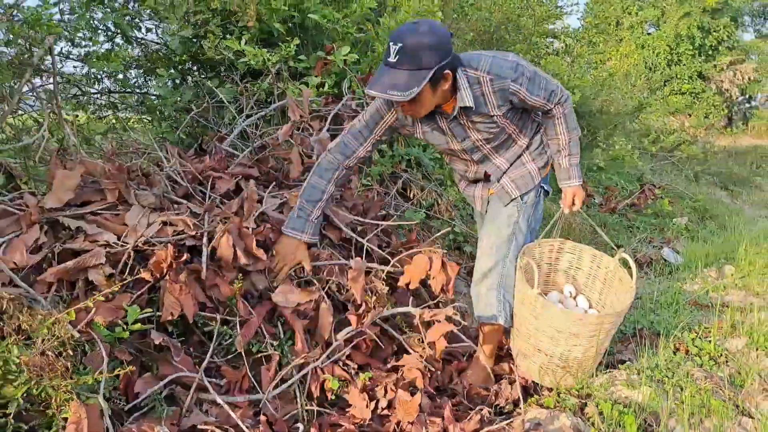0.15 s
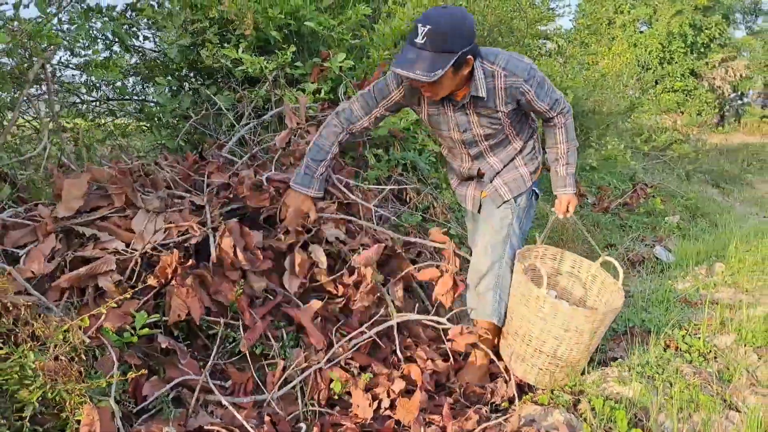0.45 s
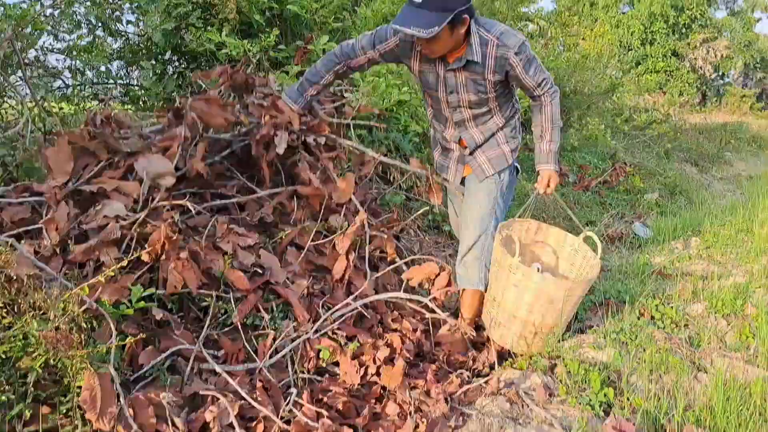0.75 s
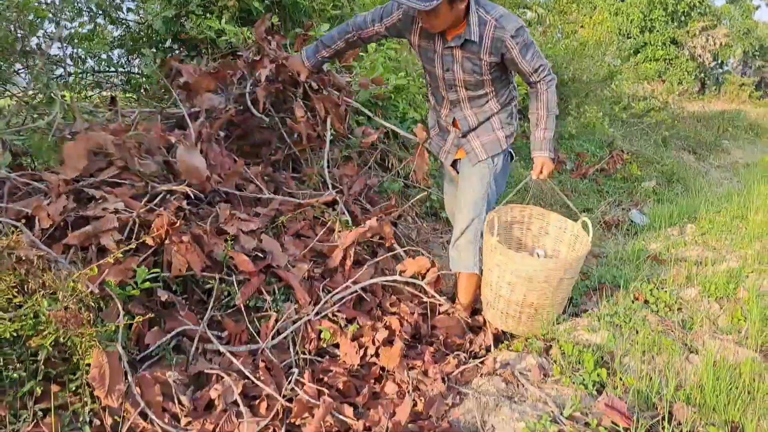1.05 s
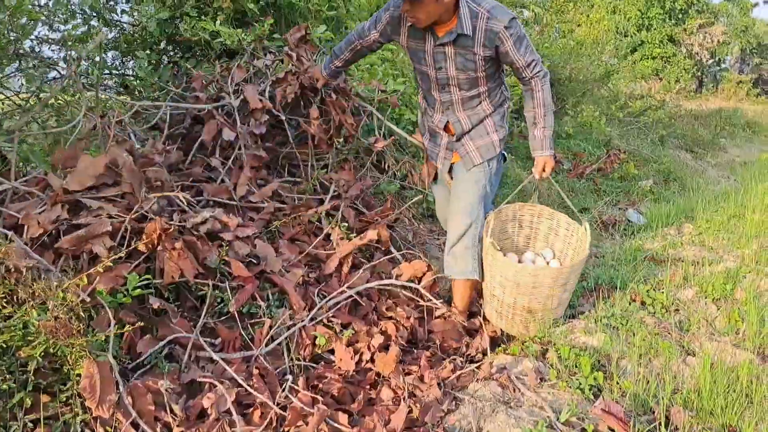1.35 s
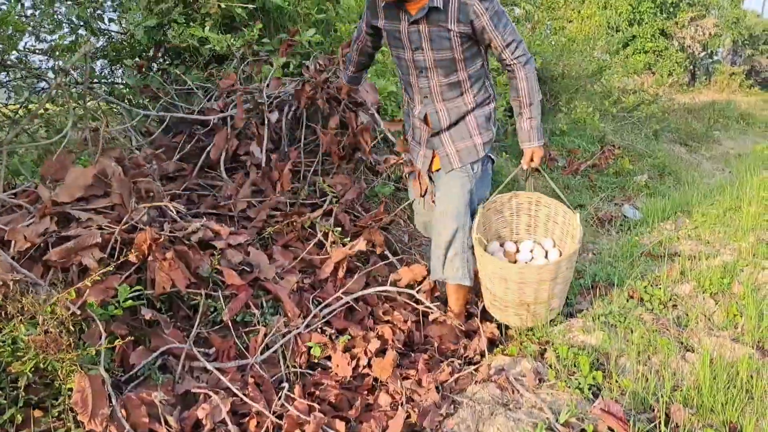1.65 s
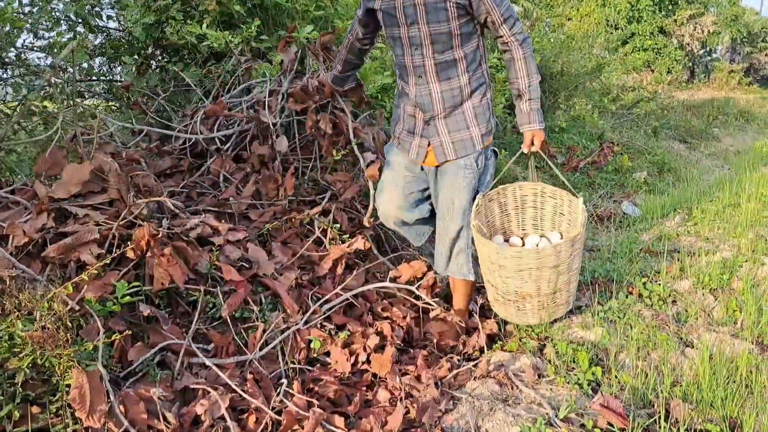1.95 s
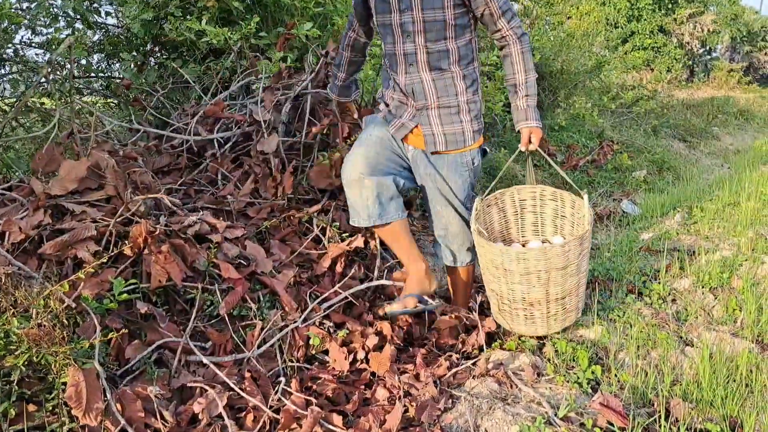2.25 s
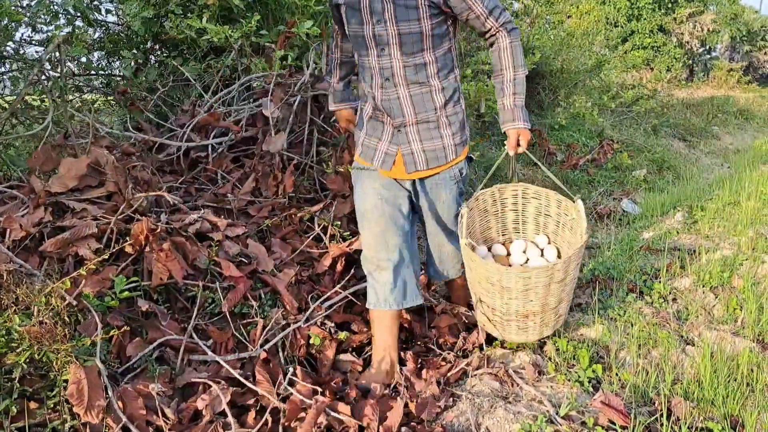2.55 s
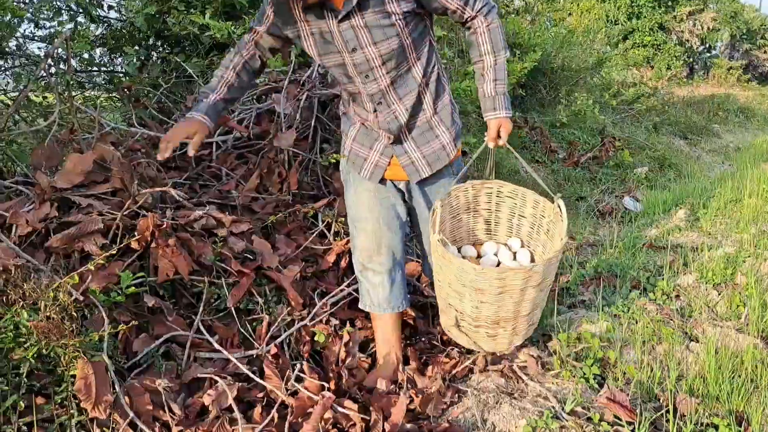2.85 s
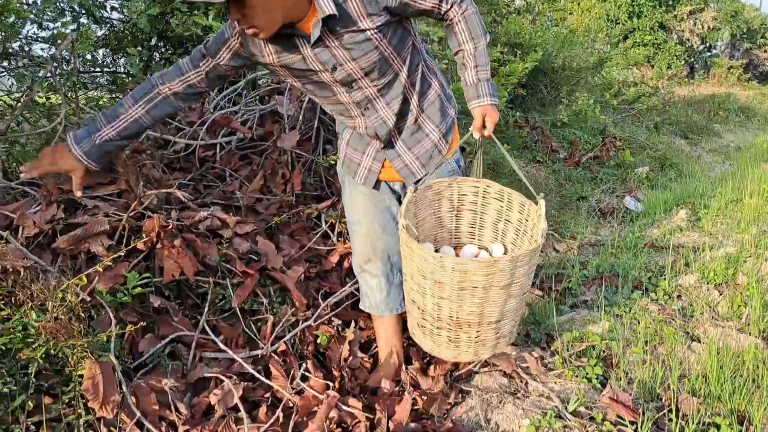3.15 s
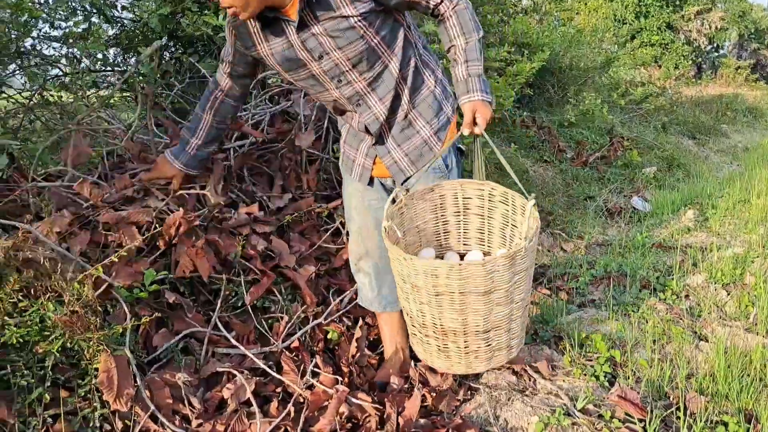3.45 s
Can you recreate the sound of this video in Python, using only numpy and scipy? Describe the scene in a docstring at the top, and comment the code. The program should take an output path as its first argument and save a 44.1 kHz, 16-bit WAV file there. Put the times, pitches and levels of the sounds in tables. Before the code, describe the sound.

Dead leaves rustle and crackle outdoors, a few metres away, dragged for the first two seconds with twigs cracking and branches knocking, strongest before 1 second. A step crunches into the litter from 2.2 seconds, and a stick snaps loudly at 2.7. After a lull with small cracks, the rustling swells again from 3.3. Faint, high insect buzzes come and go from 1.3 over a soft distant rumble.

```python
"""Dead leaves and twigs dragged off a brush pile, outdoors, a few metres from a two-port microphone.
Someone pulls the bundle, steps into the litter, snapping a stick, and grabs the pile again.
The rustle is thousands of tiny leaf fractures with scraping between them; twigs crack above it,
branches knock and pressed litter crunches below. Behind, an insect buzzes over a low distant rumble."""
import sys
import numpy as np
from scipy import signal
from scipy.fft import rfft, irfft
from scipy.io import wavfile
from scipy.ndimage import uniform_filter1d

SR = 44100
rng = np.random.default_rng(int(sys.argv[2]) if len(sys.argv) > 2 else 0)


def to_wav(sig):
    """Store sig (one row per channel, or 1-D mono) as 16-bit WAV at the path in sys.argv[1].

    Samples outside -1..1 are clipped; the rate is SR.
    """
    pcm = np.clip(np.atleast_2d(sig), -1, 1) * 32767
    pcm = np.round(pcm).astype(np.int16)
    wavfile.write(sys.argv[1], SR, pcm.T)  # frames by channels


N = 158760
TOP_HZ = 15600  # the recorder's upper limit
PORT_LAG_S = .00013  # the left port hears the pile first
LEAF_T60_S = .013  # typical ring of one leaf


def undb(db):
    """Decibels to amplitude."""
    return 10 ** (np.asarray(db) / 20)


def unit(x):
    """Scale to an RMS of 1."""
    return x / np.sqrt(np.mean(x ** 2))


def bins():
    """Frequency of every spectral bin."""
    return np.maximum(np.arange(N // 2 + 1) * SR / N, 1)


def gains(points):
    """Gain per bin from (Hz, dB) points."""
    hz, db = np.array(points, float).T
    return undb(np.interp(np.log(bins()), np.log(hz), db))


def causal(gain):
    """Causal response with these gains: nothing sounds before a click."""
    cepstrum = irfft(np.log(gain), N)
    cepstrum[1:N // 2] *= 2
    cepstrum[N // 2 + 1:] = 0
    return np.exp(rfft(cepstrum))


def colour(x, points):
    """Filter by (Hz, dB) points, keeping the power of white noise."""
    gain = gains(points)
    return irfft(rfft(x) * causal(gain / np.sqrt(np.mean(gain ** 2 * (bins() < TOP_HZ)))), N)


def whiten(x):
    """Even out the broad colour of a crowd of grains."""
    spectrum = rfft(x)
    power = uniform_filter1d(np.mean(np.abs(spectrum) ** 2, axis=0), size=1500)
    return unit(irfft(spectrum * causal(power ** -.5), N))


def fade(t, t60):
    """Decay that starts at t = 0."""
    return (t >= 0) * np.exp(-np.log(1000) * np.maximum(t, 0) / t60)


def drift(rate_hz):
    """Smooth random drift with a spread of 1."""
    return unit(irfft(rfft(rng.standard_normal(N)) / (1 + (bins() / rate_hz) ** 4), N))


def low_cut(x, hz, order):
    """Roll off the bass."""
    return signal.sosfilt(signal.butter(order, hz, "high", fs=SR, output="sos"), x)


def ports(three, lag_s, in_phase_hz=800, alike_hz=2660):
    """The two ports hear one direct and two scattered signals; scatter takes over in the treble."""
    direct, scatter = rfft(three[0]), rfft(three[1:])
    share = .97 / (1 + (bins() / alike_hz) ** 2)
    lag = lag_s / (1 + (in_phase_hz / bins()) ** 2)
    delay = np.exp(1j * np.pi * bins() * lag * np.array([[1], [-1]]))
    return irfft(np.sqrt(share) * direct * delay + np.sqrt(1 - share) * scatter, N)


def crackle(per_s, t60, spread_db, q, count=12, size=768):
    """Tiny clicks of uneven strength, each ringing one of many short resonances."""
    age, out = np.arange(size) / SR, np.zeros((3, N))
    strength = undb(spread_db * np.minimum(rng.exponential(size=N), 4))
    clicks = (rng.random(N) < per_s / SR) * strength * rng.choice([-1, 1], N) / np.sqrt(per_s)
    which = rng.integers(count, size=N)
    for k in range(count):
        grain = rng.standard_normal((3, size)) * fade(age, t60 * 2 ** rng.uniform(-.91, 1))
        ring_hz = 1100 * 13 ** ((k + rng.random()) / count)
        grain = unit(grain) + unit(signal.lfilter(*signal.iirpeak(ring_hz, q, fs=SR), grain))
        out += signal.oaconvolve((clicks * (which == k))[None], grain, axes=1)[:, :N]
    return whiten(out)


# The far background. Each row: frequency in Hz, relative level in dB.
RUMBLE_COLOUR = [(22, -29), (35, -11), (50, -3), (68, 1.5), (85, -11), (125, -14), (200, -27), (1000, -42),
                 (15000, -38)]
def rumble(level_db=-58, evenness=.6):
    """A soft rumble in the distance, its swells partly evened out."""
    sound = unit(colour(ports(rng.standard_normal((3, N)), lag_s=0), RUMBLE_COLOUR))
    power = uniform_filter1d(np.mean(sound ** 2, axis=0), size=3000)
    return undb(level_db) * unit(sound / power ** (evenness / 2))


# Insect phrases. Each row: start in seconds, length in seconds, level in dB.
BUZZES = [(1.28, 0.092, -52), (1.53, 0.19, -52), (1.85, 0.092, -51.5), (2.828, 0.244, -55),
          (3.18, .16, -52.5)]
def insect(t, pitch_hz=7840, width_hz=370, stroke_hz=145):
    """Rapid wing strokes ring a narrow resonance; each phrase swells and stops short."""
    band = 1 / (1 + ((bins() - pitch_hz) / (width_hz / 2)) ** 4)
    tone = unit(irfft(rfft(rng.standard_normal((2, N))) * band, N))
    phrases = sum(undb(db) * np.clip((t - start) / .045, 0, 1) * np.clip((start + span - t) / .006, 0, 1)
                  for start, span, db in BUZZES)
    return tone * phrases * (1 + .27 * np.sin(2 * np.pi * stroke_hz * t))


# Hand or foot flattening the litter. Each row: peak time, rise and fall in seconds, level in dB.
PRESSES = [(.24, 0.12, 0.2, -39), (.55, 0.04, 0.086, -39.5), (2.625, 0.06, 0.033, -36),
           (3.52, 0.12, 0.13, -45)]
# Tone of that crunch. Each row: frequency in Hz, relative level in dB.
PRESS_COLOUR = [(60, -26), (160, -9), (290, 5), (600, -0.5), (1100, 4.5), (2000, -0.5), (5000, -30),
                (15000, -44)]
def press(t):
    """A dull crunch swells and dies each time weight comes down on the leaves."""
    swell = sum(undb(db) * np.exp(-.5 * ((t - at) / np.where(t < at, rise, fall)) ** 2)
                for at, rise, fall, db in PRESSES)
    crunch = crackle(per_s=1100, t60=LEAF_T60_S, spread_db=1, q=1.1)
    return colour(ports(crunch, lag_s=.00008), PRESS_COLOUR) * swell


# Thicker branches giving way, dead centre.
# Each row: start in seconds, level in dB, lowest mode in Hz, T60 in seconds.
KNOCKS = [(.157, -32, 480, .045), (.246, -29, 470, .03), (.5132, -28, 560, .028), (1.151, -32, 590, .035),
          (2.389, -36, 560, .035), (2.436, -34, 560, .025), (2.639, -30, 520, .025),
          (3.1595, -43, 470, .04), (3.167, -41, 470, 0.037)]
# Bending modes of a branch. Each row: ratio to the lowest mode, relative level in dB.
BRANCH_MODES = [(1, -1.5), (1.95, -0.5), (2.7, -4.5), (4.8, -2)]
def branches(t, roughness=.35):
    """A branch rings in a few damped bending modes, roughened by the leaves against it."""
    out = np.zeros(N)
    for start, db, hz, t60 in KNOCKS:
        age = t - start
        ring = sum(undb(mode_db) * np.sin(2 * np.pi * hz * ratio * age)
                   for ratio, mode_db in BRANCH_MODES)
        out += undb(db) * fade(age, t60) * ring
    return low_cut(out * (1 + roughness * drift(310)), hz=380, order=3)  # branches radiate little bass


# The stick underfoot. Each row: mode frequency in Hz, relative level in dB, T60 in seconds.
STICK_MODES = [(780, -27, .028), (1150, -19, .028), (1610, -15, .021), (2490, -23, .02),
               (3420, -19.5, .016), (5270, -23, .013), (7800, -29, 0.015), (13800, -21, .006)]
# Tone of splitting wood, stick and twigs alike. Each row: frequency in Hz, relative level in dB.
WOOD_COLOUR = [(100, -27), (400, -7.5), (1200, 1.5), (2600, 6), (5200, 3.5), (7900, 0.5), (9200, -4),
               (14000, -1)]
def stick(t, start_s=2.693, push_s=.00008, gain_db=-5, right_db=2.5):
    """Just right of centre, one sharp push as the wood gives, a ring, splinters and shaken litter."""
    age = t - start_s
    u = age / push_s
    push = 1.1 * np.exp(-u ** 2 / 2) - .48 * np.exp(-(u / 2.2 - .55) ** 2 / 2)
    push = low_cut(push, hz=330, order=1)  # a thin stick radiates little bass
    ring = sum(undb(db) * np.cos(2 * np.pi * hz * age) * fade(age, t60) for hz, db, t60 in STICK_MODES)
    splinters, litter = undb(-15) * fade(age, .014), undb(-30) * fade(age, .22)
    debris = colour(ports(rng.standard_normal((3, N)) * (splinters + litter), lag_s=0), WOOD_COLOUR)
    pan = undb(np.array([[-1], [1]]) * right_db / 2)
    return undb(gain_db) * ((push + ring) * pan + debris)


# Twigs cracking in the pile. Each row: start in seconds, relative level in dB, ring pitch in Hz,
# tilt in dB per octave, shaken leaves in dB relative to the crack.
TWIGS = [(.133, -26, 1430, 1, -9), (.157, -26, 930, -4, -12), (.2446, -18, 2700, 2, -11),
         (.257, -23, 2300, -2, -10), (.4178, -17.5, 3200, 1, -18), (.432, -19, 2900, 0, -15),
         (.5124, -12, 5070, 2.5, -11), (0.5273, -24, 2490, 0, -12), (.531, -22, 5500, 1, -12),
         (.769, -24, 3450, 0, -15), (.904, -24.5, 5220, -1, -15), (.955, -24, 9000, 2, -12),
         (1.151, -21, 1600, -1, -15), (1.736, -33, 2870, 0, -19), (1.77, -27, 6200, 0, -8),
         (1.902, -30, 3500, 0, -11), (1.977, -30, 3000, -.5, -11), (2.257, -29.5, 3860, 0, -7),
         (2.388, -28, 1600, -1.5, -14), (2.435, -25.5, 2340, -2.5, -17), (2.473, -25, 3860, -1, -16),
         (2.638, -25.5, 2540, 0, -12), (2.83, -34, 4900, -.5, -17), (2.903, -38, 2500, -1, -11),
         (2.915, -37, 3310, -2, -14), (2.931, -34.5, 2400, -0.5, -13), (2.996, -40.5, 3600, -3, -6),
         (3.125, -34, 2350, -.5, -11), (3.131, -35, 3900, 0, -16), (3.1589, -24, 3900, 2.5, -24),
         (3.168, -32.5, 2750, -1, -18), (3.209, -35, 7800, 0, -8)]
def twigs(gain_db=-2, ring_db=-8.5, ring_q=8.1, tear_s=.0009, size=8192):
    """Each twig cracks as its fibres part, rings briefly at its own pitch and shakes its leaves."""
    age, out = np.arange(size) / SR, np.zeros((3, N + size))
    octaves = np.log2(np.clip(np.arange(size // 2 + 1) * SR / size, 500, TOP_HZ))
    for start, db, hz, tilt_db, shake_db in TWIGS:
        noise = rng.standard_normal((2, 3, size))
        crack, shake = unit(irfft(rfft(noise) * undb(tilt_db * octaves), size))
        ring = undb(ring_db) * unit(signal.lfilter(*signal.iirpeak(hz, ring_q, fs=SR), crack))
        snap = (crack + ring) * np.minimum(age / tear_s, 1) * fade(age, t60=.019)
        shaken = undb(shake_db) * shake * fade(age, t60=.13)
        first = int(start * SR)
        out[:, first:first + size] += undb(db + gain_db) * (snap + shaken)
    return colour(ports(out[:, :N], PORT_LAG_S), WOOD_COLOUR)


def rustle(t, effort, tone, lag_s, surge_db, full_db=-30.5, scrape_share=.36, edge_s=.11):
    """One movement in the leaves: more effort breaks more of them, over a scraping hiss."""
    times, levels = np.array(effort).T
    db = np.interp(t, times, levels)
    active = np.clip(np.minimum(t - times[0], times[-1] - t) / edge_s + 1, 0, 1)
    density = undb(db - full_db)
    fractures = crackle(per_s=4200 * density, t60=LEAF_T60_S, spread_db=1.6, q=3.5)
    scrape = rng.standard_normal((3, N))
    leaves = np.sqrt(1 - scrape_share) * fractures + np.sqrt(scrape_share) * scrape
    # sparse, sharp ticks make the rustle's treble grainier
    ticks = undb(-13) * crackle(per_s=100 * np.sqrt(density), t60=.0075, spread_db=1.5, q=8)
    sound = colour(ports(leaves + ticks, lag_s), tone)
    # the pile's low body, under 280 Hz, fades a little less than the rest as the movement eases
    body = irfft(rfft(sound) / (1 + (bins() / 280) ** 4), N)
    sound += body * (undb(.1 * (full_db - db)) - 1)
    return sound * undb(db + surge_db * drift(29)) * active


# Strength of each movement in the leaves. Each row: time in seconds, level in dB.
DRAG_EFFORT = [(0, -37), (0.07, -33), (0.11, -34.5), (0.2, -31.5), (0.36, -31), (0.48, -30.5), (0.55, -29),
               (0.7, -29), (0.84, -28.5), (0.969, -30), (1.11, -34), (1.22, -32.5), (1.38, -37), (1.5, -35),
               (1.629, -35), (1.84, -40.5), (1.91, -37.5), (1.99, -38.5), (2.06, -47)]
STEP_EFFORT = [(2.06, -47), (2.19, -44), (2.28, -37), (2.35, -41), (2.41, -38), (2.53, -36), (2.59, -35.5),
               (2.64, -33.5), (2.675, -39), (2.72, -40), (2.78, -52)]
REACH_EFFORT = [(2.78, -52.5), (2.87, -51), (2.92, -47.5), (2.97, -51.5), (3.01, -47.5), (3.07, -47),
                (3.14, -44), (3.195, -50), (3.22, -41.5), (3.29, -48.5), (3.325, -39.5), (3.35, -32.5),
                (3.43, -30), (3.52, -31), (3.6, -29.5)]
# Tone of the leaves in each movement. Each row: frequency in Hz, relative level in dB.
DRAG_COLOUR = [(70, -10.5), (150, -2), (300, -3), (550, -1), (950, -0.5), (1300, -2), (2600, 3),
               (5200, 0.5), (6600, -3.5), (7900, -4), (9000, -5.5), (14500, -5)]
STEP_COLOUR = [(70, -9), (150, -1), (300, -1.5), (550, 1.5), (950, -0.5), (1300, 0), (2600, 2), (5200, 0),
               (6600, -3.5), (7900, -2.5), (9000, -6), (14500, -5)]
REACH_COLOUR = [(70, -9.5), (150, -3), (300, -4), (550, 1), (950, 0.5), (1300, 1), (2600, 2.5), (5200, 0),
                (6600, -5.5), (7900, -4), (9000, -7.5), (14500, -6.5)]
def dead_leaves(t):
    """A few metres off, leaves rustle in little surges: dragged, stepped on, then grabbed again."""
    drag = rustle(t, DRAG_EFFORT, DRAG_COLOUR, lag_s=PORT_LAG_S, surge_db=1.2)
    reach = rustle(t, REACH_EFFORT, REACH_COLOUR, lag_s=.00016, surge_db=1.57)
    step = rustle(t, STEP_EFFORT, STEP_COLOUR, lag_s=.00005, surge_db=1.43)
    return drag + step + reach


# The pile's balance at the two ports. Each row: frequency in Hz, left minus right in dB.
PORT_BALANCE = [(60, -1), (250, 1), (700, -1), (1300, -2.5), (2200, -2), (4400, -4), (7800, -3), (9000, 0),
                (12000, 3), (15000, 1.5)]
def scene():
    """The brush pile as the microphone hears it, with the insect and the rumble behind."""
    t = np.arange(N) / SR
    pile = dead_leaves(t) + press(t) + twigs()
    balance = gains(PORT_BALANCE) ** np.array([[.5], [-.5]])
    return irfft(rfft(pile) * balance, N) + branches(t) + stick(t) + insect(t) + rumble()


def record(dry):
    """The deepest bass is rolled off, and the recorder cuts the top steeply."""
    top_cut = signal.ellip(10, .1, 80, TOP_HZ, fs=SR, output="sos")
    return signal.sosfilt(top_cut, low_cut(dry, hz=33, order=4))


dry = scene()
out = record(dry)
to_wav(out)
```